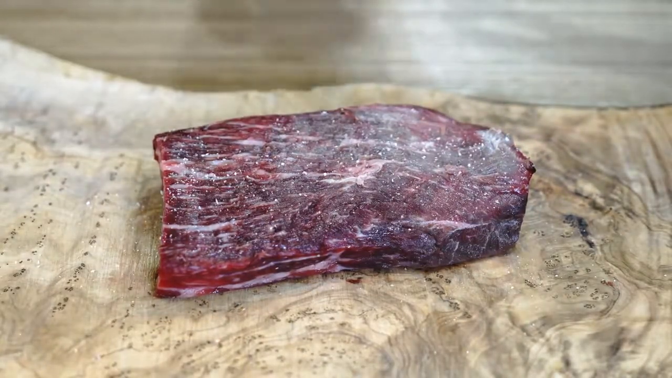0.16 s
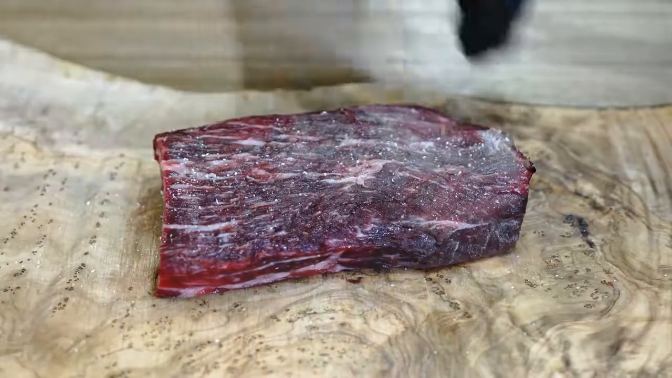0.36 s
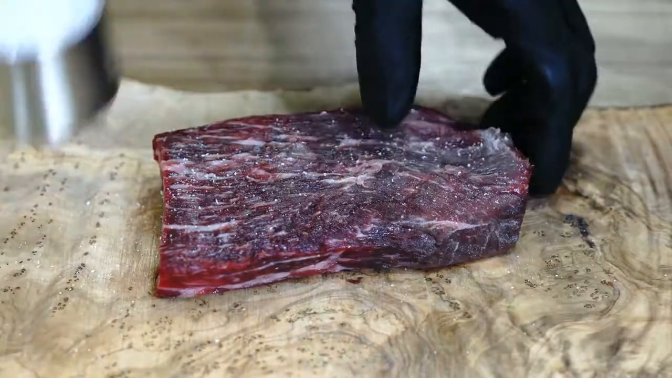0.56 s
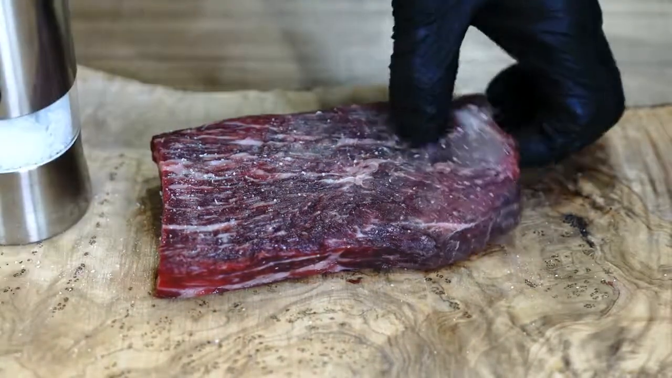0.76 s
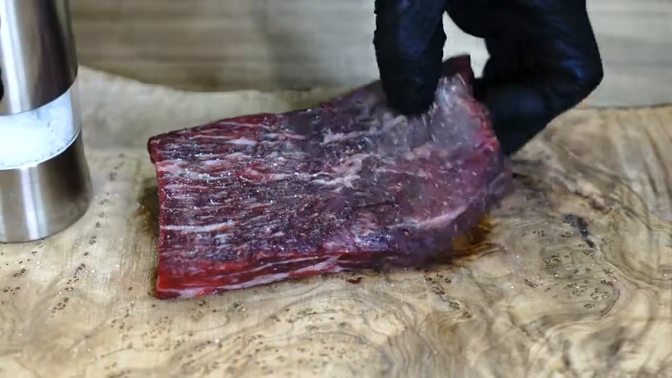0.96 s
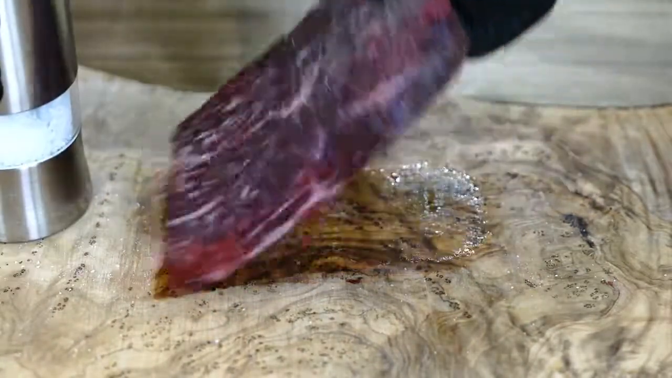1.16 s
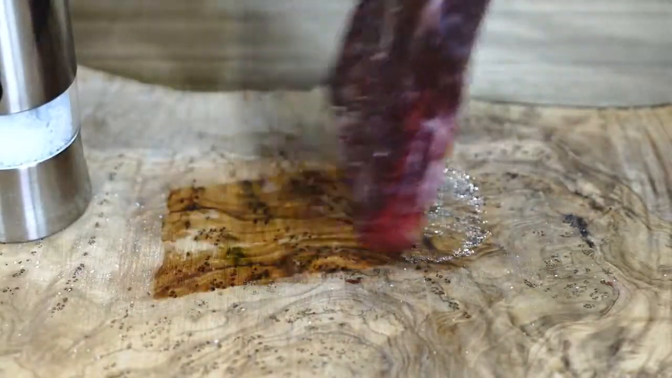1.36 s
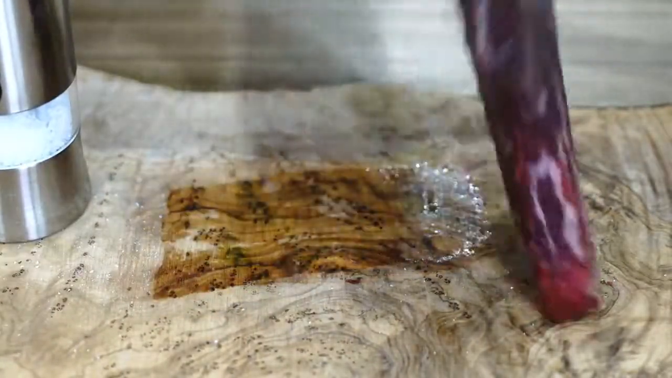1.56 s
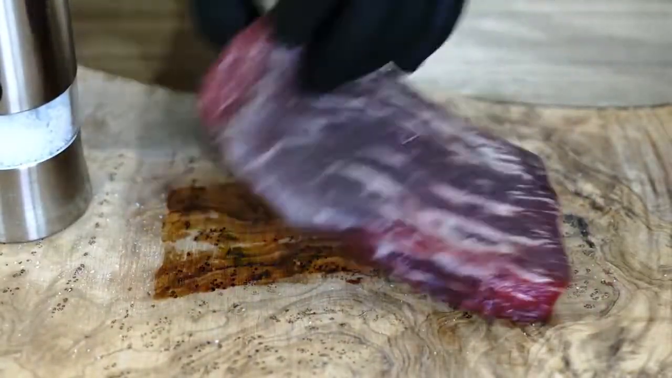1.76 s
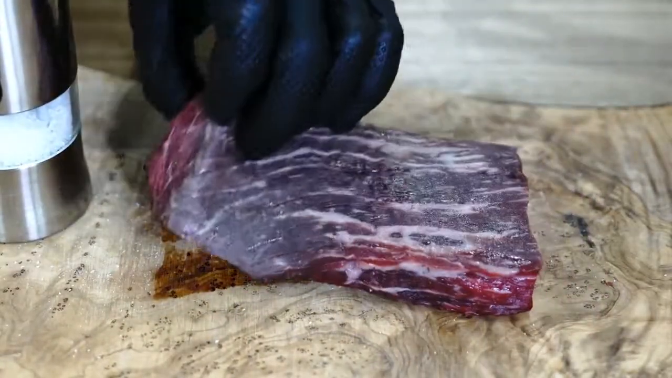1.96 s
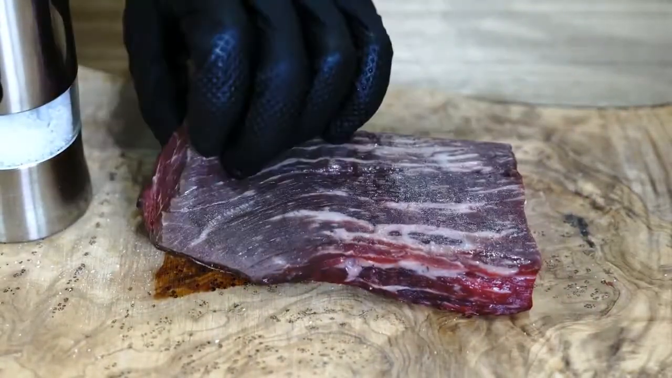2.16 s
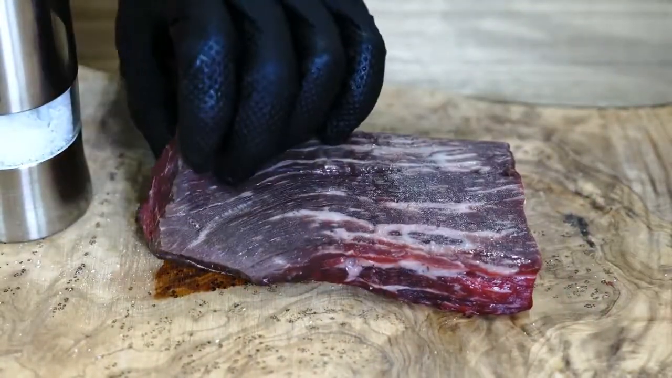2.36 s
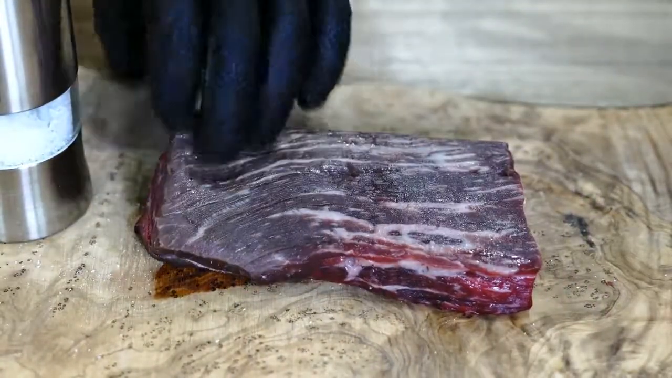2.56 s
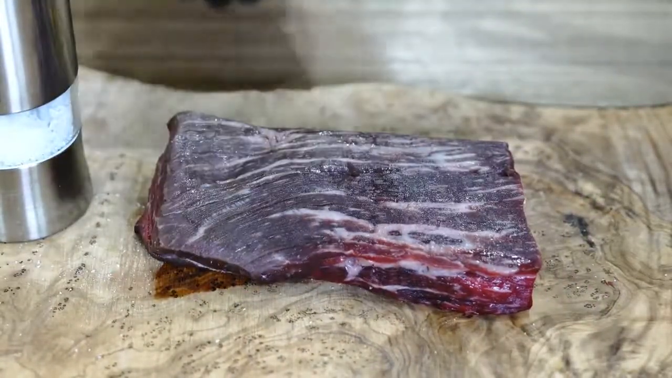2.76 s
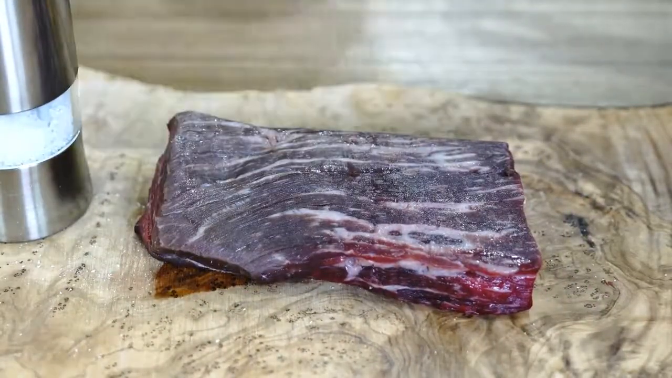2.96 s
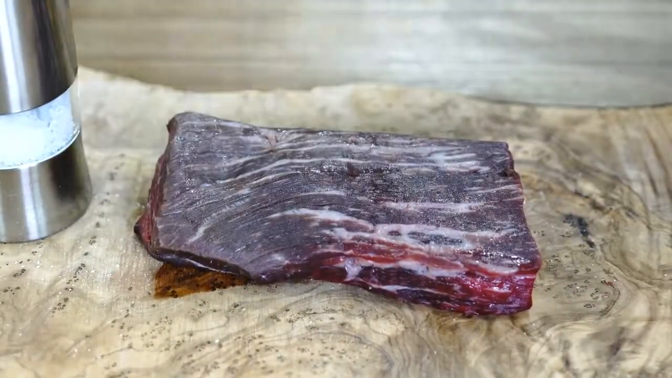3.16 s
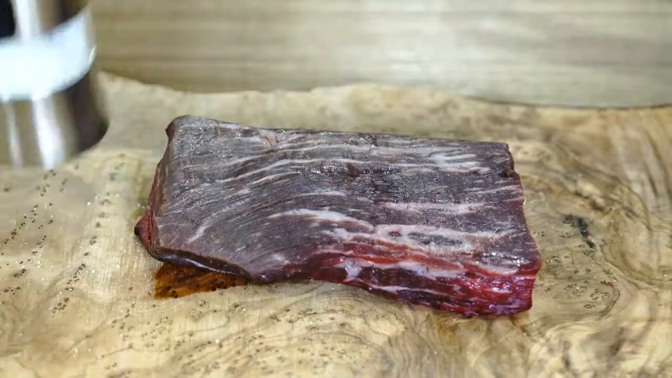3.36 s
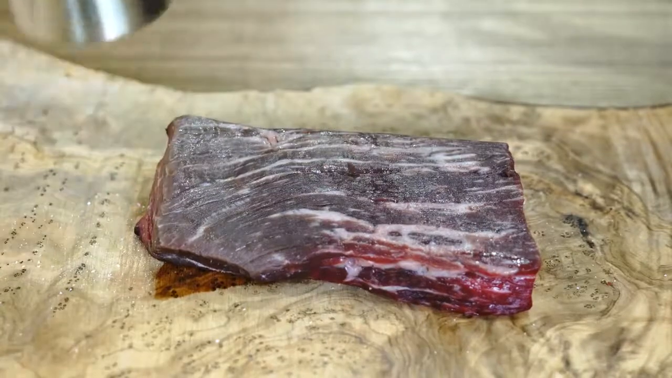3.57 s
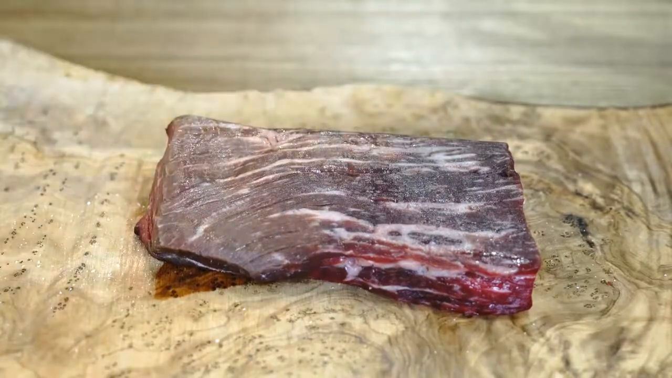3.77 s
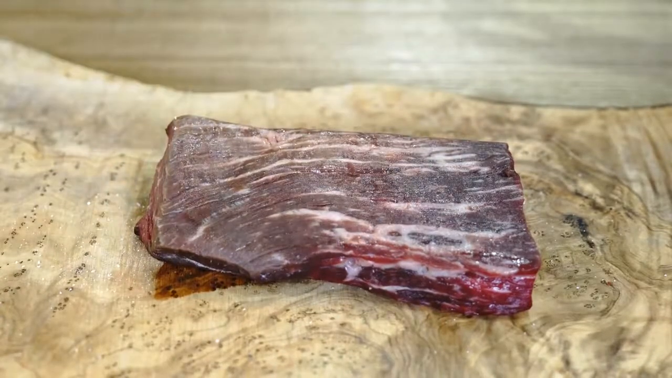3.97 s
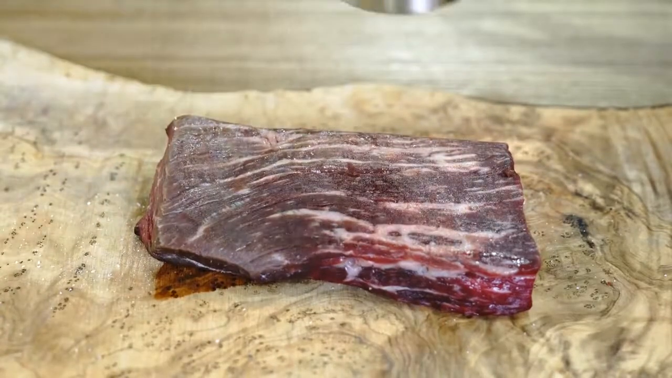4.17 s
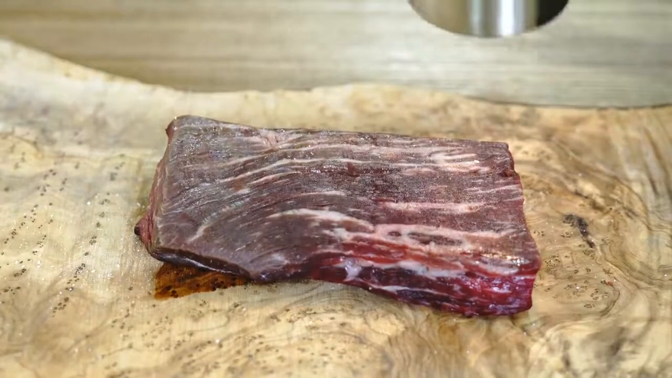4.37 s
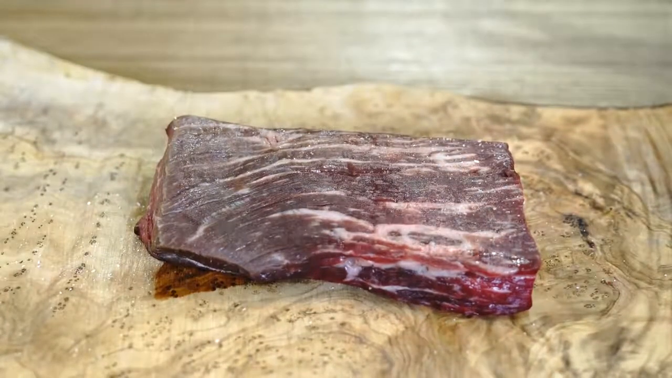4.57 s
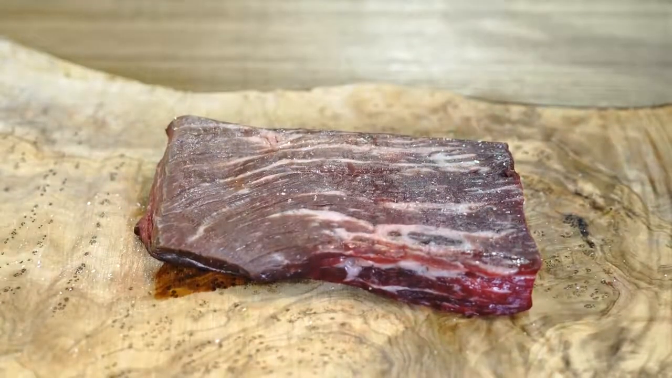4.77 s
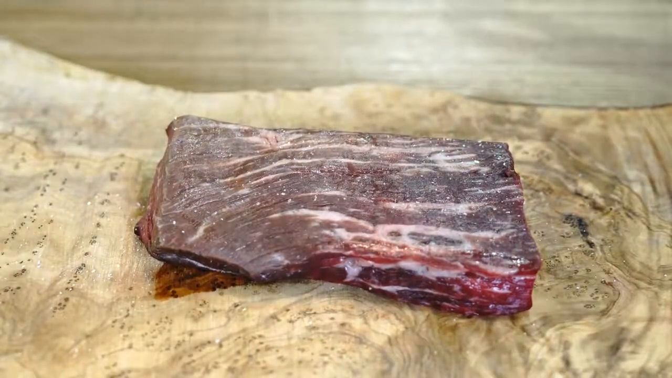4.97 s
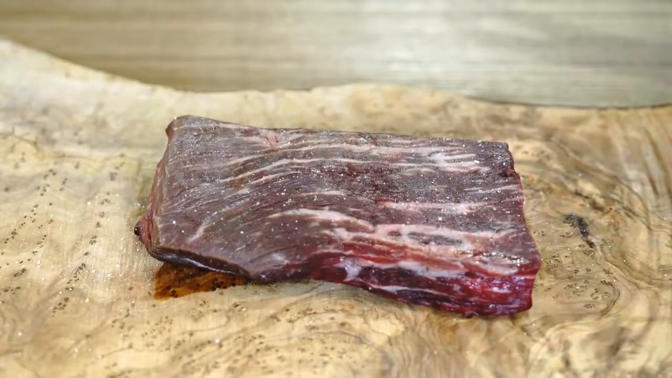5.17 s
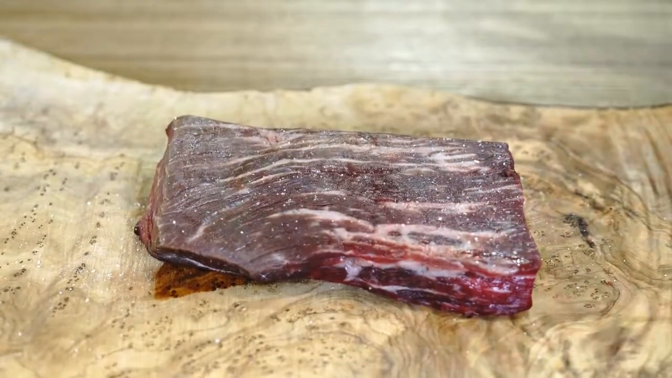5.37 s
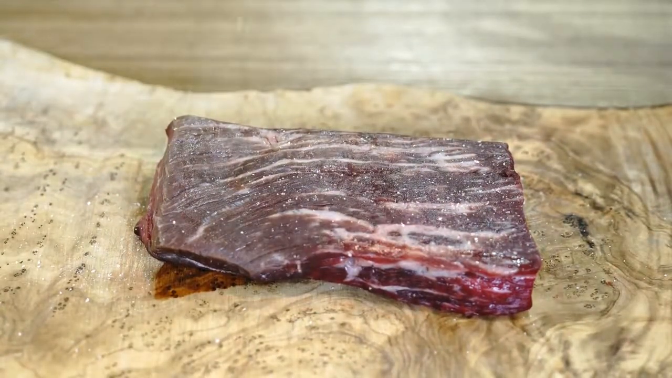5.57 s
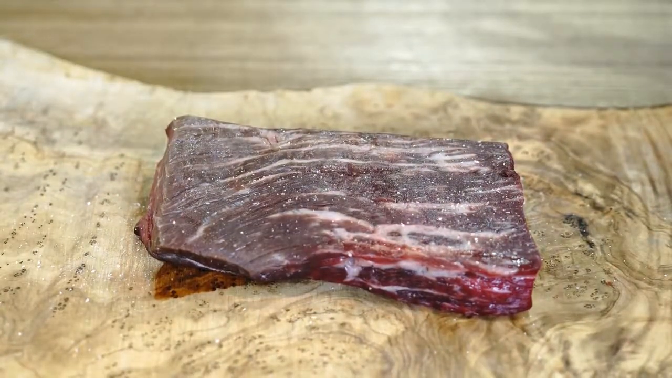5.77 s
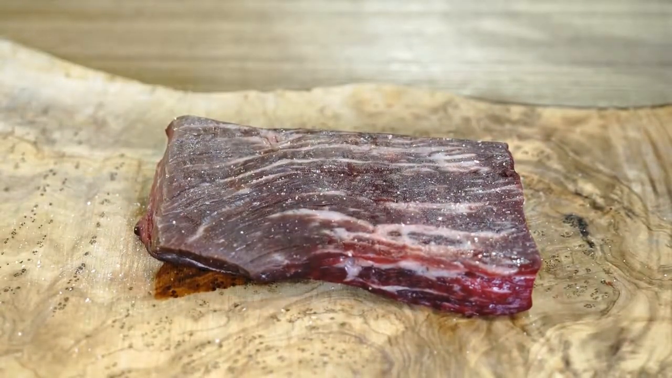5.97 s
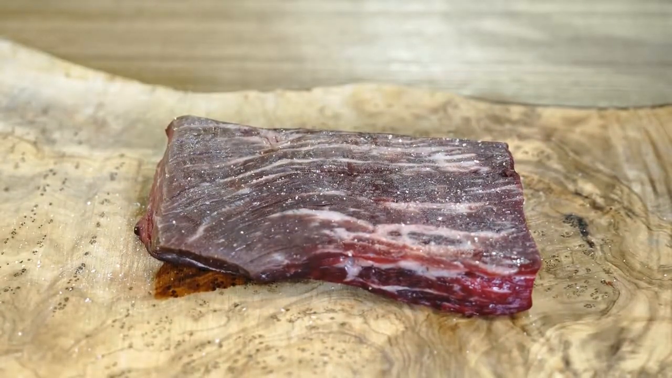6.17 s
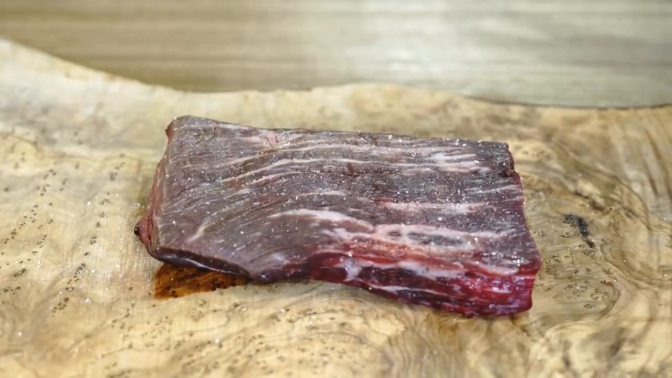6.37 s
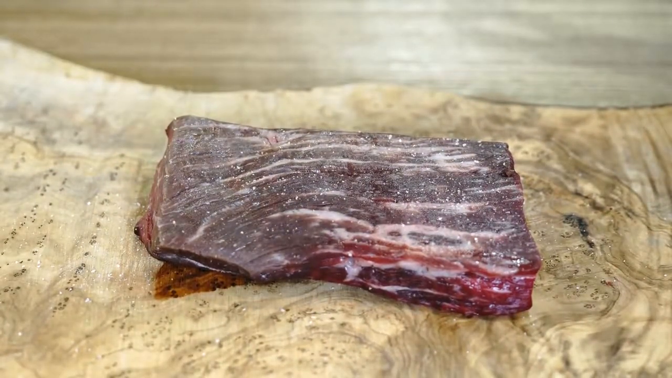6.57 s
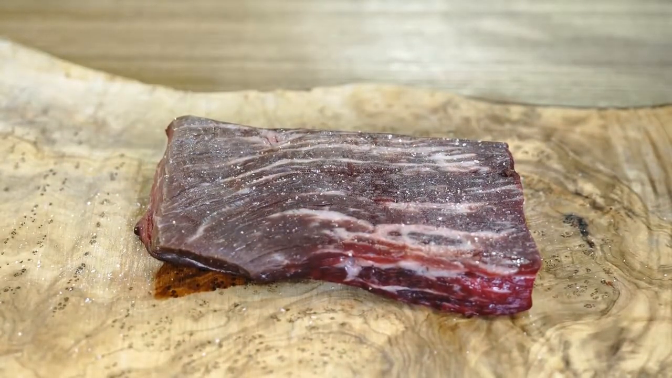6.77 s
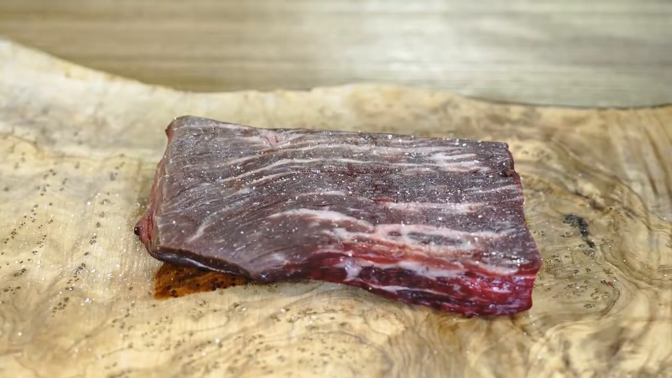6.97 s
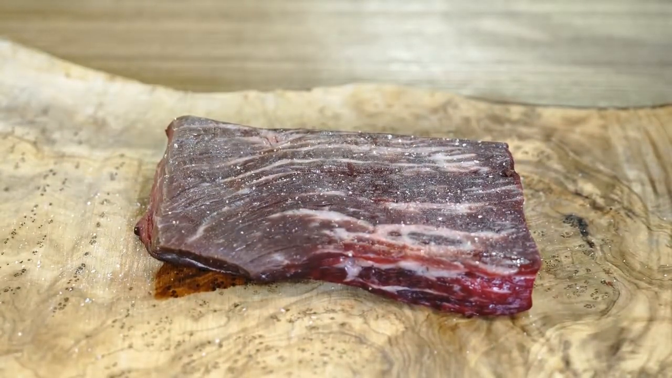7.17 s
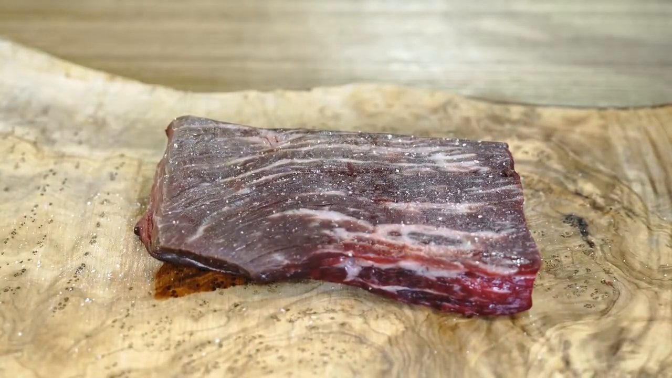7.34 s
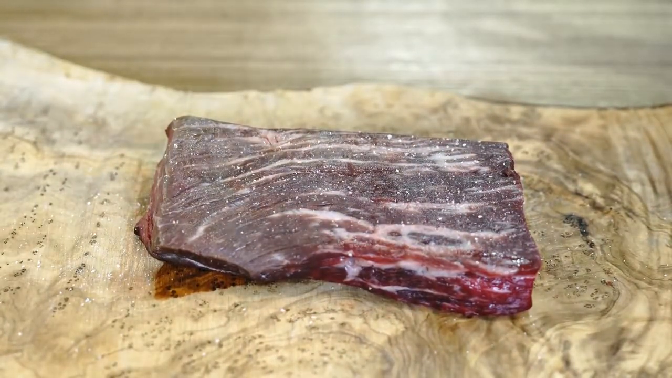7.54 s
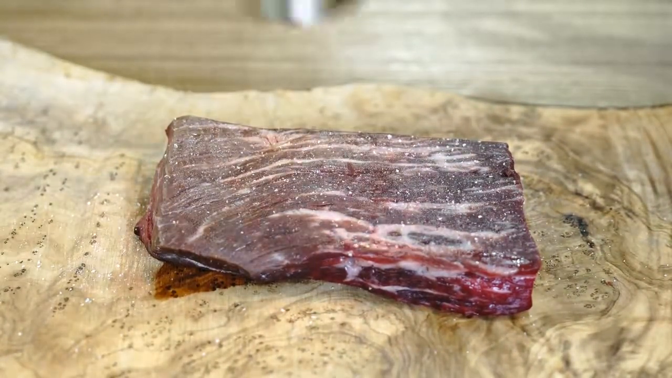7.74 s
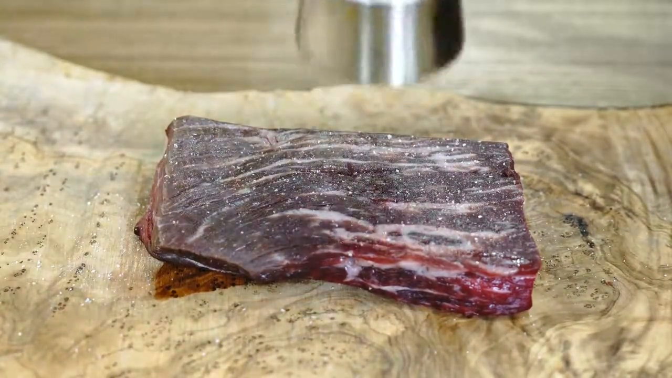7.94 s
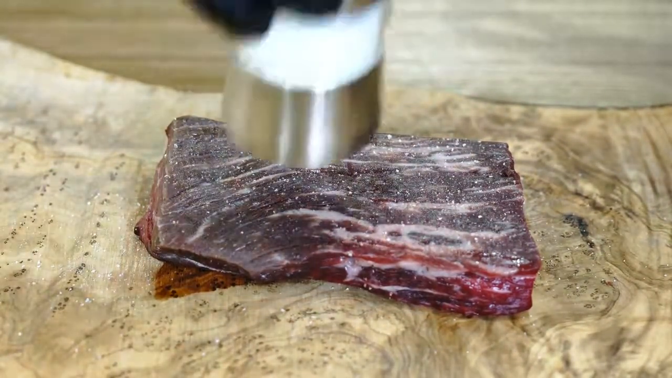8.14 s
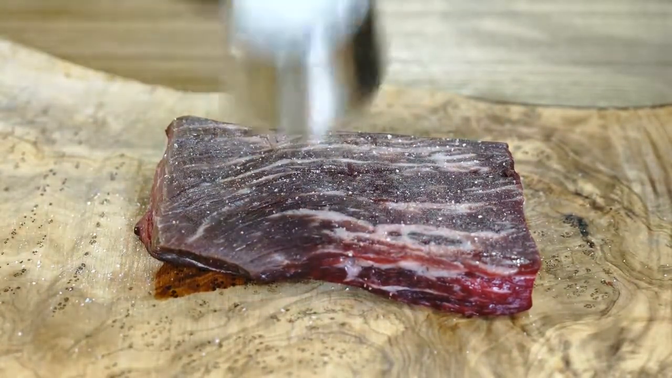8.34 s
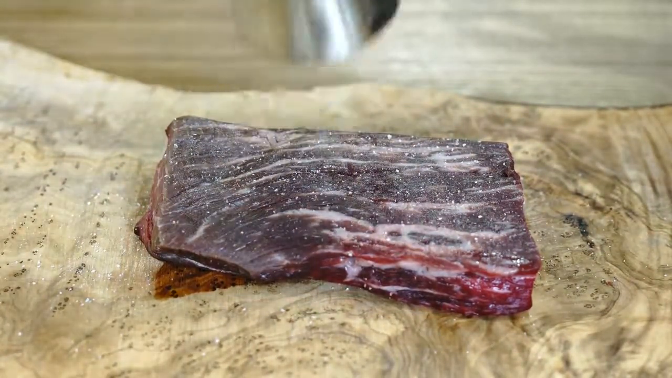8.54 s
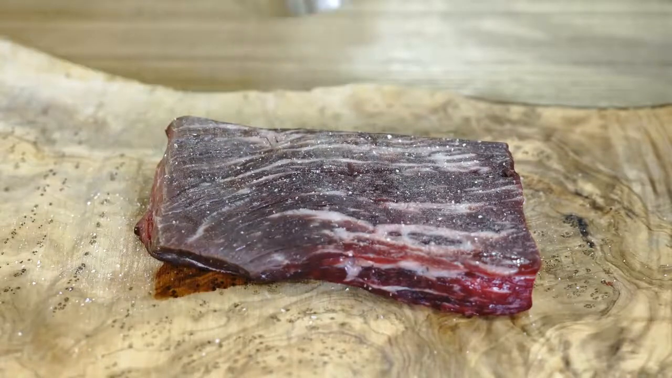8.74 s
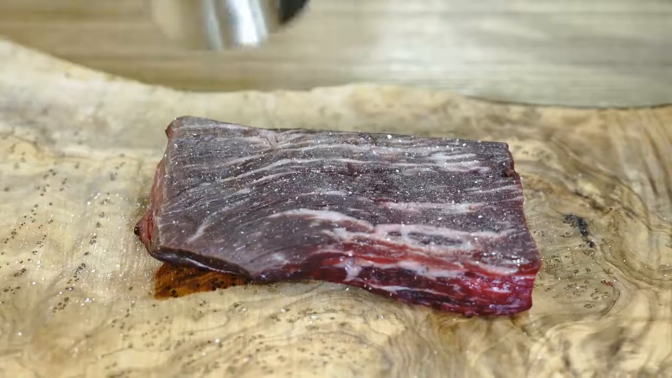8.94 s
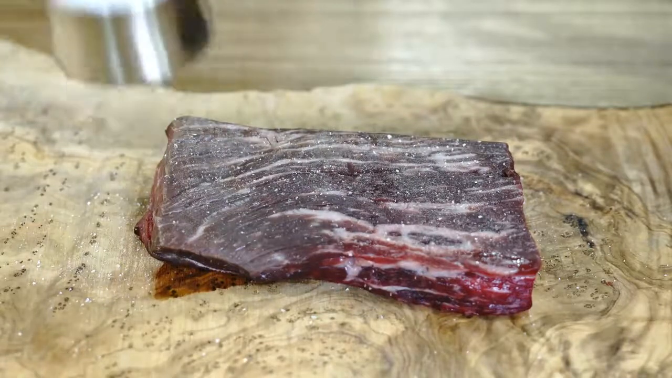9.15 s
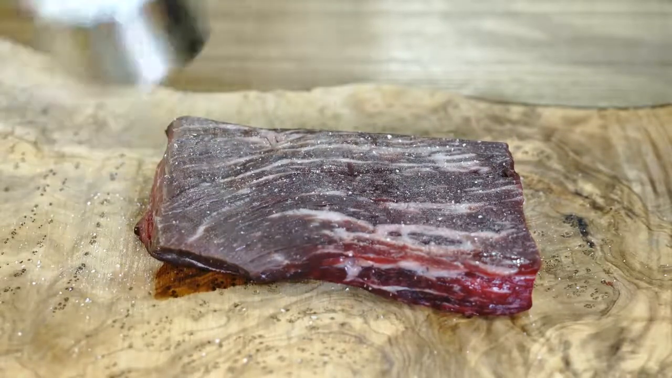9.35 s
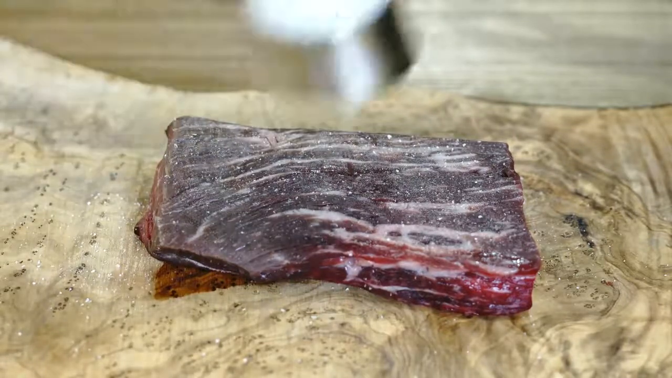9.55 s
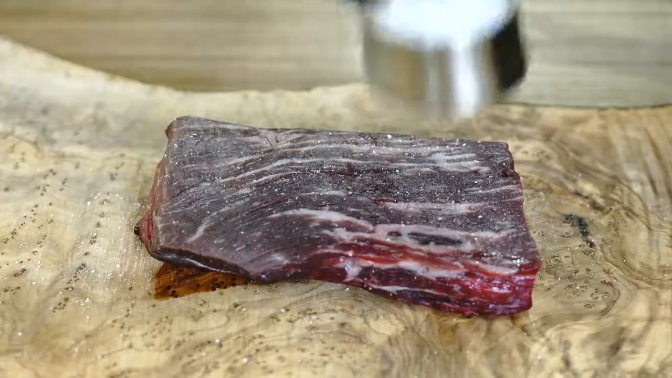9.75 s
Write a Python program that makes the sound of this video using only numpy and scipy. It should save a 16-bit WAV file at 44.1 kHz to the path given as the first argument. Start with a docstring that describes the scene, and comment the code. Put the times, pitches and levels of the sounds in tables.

```python
"""A small kitchen, one close microphone. An electric salt mill grinds over a steak on a wooden board,
stops and is set down with a knock that rings the wood. A gloved hand rubs and turns the wet meat.
The mill runs again, its gear teeth whining, slowing and rattling under load while crystals crack.
Then it is shaken, and the salt hails against lid and burr. Appliances hum faintly behind it all."""
import sys
import numpy as np
from scipy import signal
from scipy.fft import rfft, irfft
from scipy.io import wavfile
from scipy.ndimage import uniform_filter1d

SR = 44100
rng = np.random.default_rng(int(sys.argv[2]) if len(sys.argv) > 2 else 0)


def to_wav(sig):
    """Store sig (one row per channel, or 1-D mono) as 16-bit WAV at the path in sys.argv[1].

    Samples outside -1..1 are clipped; the rate is SR.
    """
    pcm = np.clip(np.atleast_2d(sig), -1, 1) * 32767
    pcm = np.round(pcm).astype(np.int16)
    wavfile.write(sys.argv[1], SR, pcm.T)  # frames by channels


N = 432621
T = np.arange(N) / SR


# motor runs: (button pressed t/s, button snaps back t/s)
MOTOR_RUNS = [(-.1, .379), (3.68, 7.906)]
def mill():
    """One motor drives gears and burr; the more salt is being crushed, the louder they all play."""
    feed_db = salt_feed()
    loaded_hz, speed_hz = motor_speed()
    mesh_hz = speed_hz * (1 + .022 * walk(45) + .028 * walk(400))
    tooth_phase = 2 * np.pi * np.cumsum(mesh_hz) / SR
    # a slow gear runs out of true, so the load throbs once in its turn
    throb_db = 1.6 * np.sin(tooth_phase / 57 + .8 * walk(12)) + 1.3 * walk(90)
    drive = gears(tooth_phase, loaded_hz) * undb(throb_db)
    return (drive + burr(throb_db) + brushes(tooth_phase, mesh_hz)) * undb(feed_db)


def running(coast_s, release_s=.012):
    """Motor gate: 1 while on, dying away once the contact opens, just ahead of the button's snap."""
    return sum((T > on) * np.exp(-np.maximum(T - off + release_s, 0) / coast_s)
               for on, off in MOTOR_RUNS)


# pitch curve of the gear mesh, sagging as the burr bites: (t/s, f/Hz)
MESH_PITCH = [(.16, 1102), (.38, 908.4), (3.75, 1031), (3.98, 1007), (4.08, 880), (4.24, 814), (4.4, 1103),
              (4.6, 1147), (4.95, 1098), (5.48, 1114), (5.6, 1055), (5.85, 948.6), (6.1, 933.6),
              (6.42, 1062), (6.7, 1025), (7.05, 770.6), (7.24, 1069), (7.88, 1151)]
def motor_speed(spin_up_s=.035, spin_down_s=.3):
    """Gear mesh rate in Hz: under load alone, and with spin-up and run-down added."""
    loaded_hz = np.interp(T, *np.transpose(MESH_PITCH))
    spin_up = 1 - .4 * sum((T > on) * np.exp(-np.abs(T - on) / spin_up_s) for on, _ in MOTOR_RUNS)
    return loaded_hz, loaded_hz * spin_up * np.clip(running(spin_down_s), .5, 1)


# fader ride for the amount of salt being crushed: (t/s, level/dB)
FEED_RIDE = [(0.0, -20), (0.188, -22), (0.25, -24.5), (3.88, -23.5), (3.91, -26.5), (4.9, -25),
             (5.24, -28.5), (5.52, -25), (5.72, -24), (6.66, -23), (6.95, -24.5), (7.39, -24), (7.7, -25)]
def salt_feed(start_db=-9.5, start_s=.075, stop_db=-3.5, stop_s=.03):
    """Feed level in dB: salt takes a moment to be drawn in, and is let go as the motor stops."""
    dips_db = sum(start_db * np.exp(-np.abs(T - on) / start_s)
                  + stop_db * np.exp(-np.maximum(off - T, 0) / stop_s) * (T < off + 1)
                  for on, off in MOTOR_RUNS)
    return np.interp(T, *np.transpose(FEED_RIDE)) + dips_db


# EQ of the gear housing: (f/Hz, level/dB)
GEARBOX_EQ = [(150, -34), (330, -22.5), (520, -15), (720, -7.5), (1000, -2), (1230, -3), (1550, 1),
              (1950, 1.5), (2700, -2), (3600, -15.5), (5200, -10.5), (6700, -2), (8600, -15.5),
              (15000, -27)]
def gears(tooth_phase, loaded_hz, strain_hz=1071, knee_hz=21.4, strained_db=2, free_db=-7.5):
    """Teeth rattle and whine in the housing, louder when the load drags them below strain_hz."""
    slack = 1 / (1 + np.exp((strain_hz - loaded_hz) / knee_hz))
    load_db = slack * (free_db - strained_db)
    # every tooth knocks with its own strength, harder once per motor turn
    accent_db = 5.2 * np.cos(tooth_phase) + 2 * np.cos(tooth_phase / 9)
    knocks = grains(rate=7000, spread_db=1.5) * undb(accent_db)
    rattle = undb(-.45 + .085 * load_db) * colour(knocks, GEARBOX_EQ) * running(coast_s=.018)
    # the mesh sings, roughened by play between the teeth; its overtones grow with the load
    play_db = 3.5 * walk(150)
    whine = sum(undb(db + play_db + .55 * k * load_db) * np.sin((k + 1) * tooth_phase + .87 * walk(170))
                for k, db in enumerate([-6, -5.5, -18]))
    return (rattle + whine * running(coast_s=.036)) * undb(strained_db + load_db)


# EQ of the crunch in the burr: (f/Hz, level/dB)
BURR_EQ = [(120, -28), (280, -12.5), (520, 2), (1000, 5.5), (1350, -3), (2300, -3.5), (3600, -7),
           (5300, -2), (7500, 4), (8600, -5), (10800, 1), (12800, 1.5), (14000, -1.5), (16000, -1.5)]
def burr(throb_db):
    """Salt feeds unevenly and is crushed to a dense crunch; small crystals splinter on their own."""
    uneven_db = 1.4 * walk(110) + .35 * throb_db
    crunch = colour(grains(rate=10000, spread_db=2), BURR_EQ) * undb(1 + uneven_db)
    splinters = unit(resonate(grains(rate=45, spread_db=1), 5500, 4500))
    return (crunch + undb(-12) * splinters) * running(coast_s=.023)


def brushes(tooth_phase, mesh_hz):
    """The brushes hiss in two narrow bands that follow the motor, louder when it runs free."""
    low_band = undb(-1.5) * walk(1150) * np.sin(10.3 * tooth_phase)
    high_band = undb(-11) * walk(1100) * np.sin(12.9 * tooth_phase)
    return (low_band + high_band) * (mesh_hz / 1120) ** 5 * running(coast_s=.004)


# cues for large crystals breaking: (t/s, attack level/dB, centre f/Hz)
CRYSTAL_CRACKS = [(.259, -16.5, 2200), (4.069, -13, 2870), (4.272, -9, 5530), (4.327, -8, 2550),
                  (4.415, -14, 5900), (4.792, -7, 5700), (4.8619, -15.5, 2200), (4.989, -7.5, 3220),
                  (5.038, -10.5, 6050), (5.11, -9, 1790), (5.258, -11, 4600), (5.540, -7.5, 1800),
                  (6.083, -8, 6500), (6.12, -13.5, 2800), (6.5126, -13, 2608), (6.790, -8.5, 6400),
                  (7.012, -11.5, 1610), (7.128, -8.5, 7200), (7.4063, -9.5, 2340), (8.841, -10.5, 12500)]
def cracks():
    """Large crystals give way, each with one sharp snap."""
    return snaps(CRYSTAL_CRACKS)


def chips(per_s=6, over_feed_db=6, spread_db=3.5, centre_hz=4850, spread_octaves=.77):
    """Lesser crystals crack at random while the mill runs; their level rides on the feed."""
    out, feed_db = np.zeros(N), salt_feed()
    for on, off in MOTOR_RUNS:
        for k, (jitter, size, pitch) in enumerate(rng.uniform(-1, 1, size=(60, 3))):
            s = on + (k + 1 + jitter) / per_s
            chip = snap(centre_hz * 2 ** (spread_octaves * pitch))
            if 0 < s < off:
                add(out, s, undb(feed_db[int(s * SR)] + over_feed_db + spread_db * size) * chip)
    return out


# the button's two layers, click and housing knock: (level/dB, centre f/Hz)
BUTTON_LAYERS = [(-9.5, 3250), (-15.5, 740)]
def button():
    """The button snaps back at the end of each run."""
    return snaps([(off, db, hz) for _, off in MOTOR_RUNS for db, hz in BUTTON_LAYERS])


# EQ of the salt chamber: (f/Hz, level/dB)
CHAMBER_EQ = [(300, -44.5), (600, -26.5), (800, -30.5), (1030, -12), (1280, -14), (1700, -11.5),
              (2500, -10), (2900, -5), (4150, -3), (6400, 0), (9100, -4.5), (12700, -0.5), (16000, -10)]
# one slide of salt as the mill is tipped: (t/s, level/dB, half length t/s)
TIP_SLIDE = (8.183, -35.5, .018)
# salt landing back on the burr after each shake: (t/s, level/dB, half length t/s)
LANDINGS = [(8.453, -17.5, 0.002), (8.686, -17, 0.012), (8.906, -18.5, 0.026), (9.119, -19.5, 0.025),
            (9.335, -21, 0.022), (9.555, -19, 0.02), (9.758, -20, 0.034)]
def shaking(rise_s=.0083, settle_s=.009, flight_s=.042, lid_db=-2.5, clump_db=2, coarse_db=-27):
    """Each shake throws the salt at the lid and back: a cloud of impacts that trickles to rest."""
    # the lid is hit first, more softly; a looser cloud takes longer to come back
    lid_hits = [(s - flight_s - 1.04 * half_s, db + lid_db, half_s) for s, db, half_s in LANDINGS]
    power = 0
    for s, db, half_s in [TIP_SLIDE] + lid_hits + LANDINGS:
        away_s = np.hypot(T - s, half_s) - half_s
        power += (undb(db) * np.exp(-away_s / np.where(T < s, rise_s, settle_s))) ** 2
    cloud = np.sqrt(power) * undb(clump_db * walk(140))
    impacts = grains(rate=22000, spread_db=1.8)
    burr_ring = undb(-16.5) * unit(resonate(impacts, 1110, 194))
    burr_ring += undb(-10.5) * unit(resonate(impacts, 6900, 3600))
    # a few coarse crystals stray from the cloud and tick on their own
    coarse = undb(coarse_db) * unit(resonate(grains(rate=39, spread_db=-1), 10300, 9000))
    return (colour(impacts, CHAMBER_EQ) + .32 * burr_ring) * cloud + coarse * np.sqrt(cloud)


# modes of the board with the mill on it: (f/Hz, level/dB, 60 dB decay t/s)
BOARD_MODES = [(124, -15, 0.13), (250, -1.5, 0.076), (289, -2, 0.068), (395, -4, 0.038), (528, -5, 0.056),
               (875, -10, 0.045), (1130, 2.5, 0.033), (1286, -7, 0.08), (1360, -2, 0.053),
               (1520, -2, 0.028), (1765, 0.5, 0.029), (1940, -8.5, 0.067), (2790, -10, 0.04),
               (3260, -4.5, 0.031)]
# mill and meat hitting the board: (t/s, level/dB as if packed into 10 ms, low-pass f/Hz)
BOARD_HITS = [(0.695, -42.5, 300), (.826, -9.5, 3170), (1.718, -34, 3000), (2.5, -42, 450)]
def board(attack_s=.00134, contact_s=.0046, rattle_s=.025):
    """Each blow rings the board; a soft contact leaves mainly the low modes."""
    out, t = np.zeros(N), np.arange(SR // 3) / SR
    ring = sum((-1) ** k * undb(db - 60 * t / t60) * np.sin(2 * np.pi * hz * t)
               for k, (hz, db, t60) in enumerate(BOARD_MODES))
    for s, db, bright_hz in BOARD_HITS:
        scrape = unit(resonate(rng.standard_normal(len(t)), 2000, 16000)) * np.exp(-t / contact_s)
        rattle = unit(resonate(rng.standard_normal(len(t)), 520, 1700)) * np.exp(-t / rattle_s)
        blow = (ring + undb(1.5) * scrape + undb(-7.5) * rattle) * np.minimum(t / attack_s, 1)
        softened = signal.lfilter(*signal.butter(1, bright_hz, fs=SR), blow)
        add(out, s, undb(db) * packed(softened, .01))
    return out


# glove strokes on steel and meat: (t/s, length t/s, level/dB, centre f/Hz, width f/Hz)
GLOVE_RUBS = [(0.443, 0.37, -51.5, 2400, 8950), (.607, 0.046, -36.5, 3120, 3300),
              (0.736, 0.019, -27, 4100, 7500), (0.756, 0.442, -45.5, 6900, 27200),
              (0.918, 0.026, -31.5, 5500, 8000), (1.798, 0.19, -58.5, 4000, 12000),
              (2.473, .12, -51.5, 2610, 1400), (2.46, .2, -51.5, 4400, 12900),
              (2.674, .52, -53, 1630, 5000), (3.216, 0.024, -50, 5500, 18000)]
def glove(rise_s=.0054, fade_s=.01):
    """Rubber slides in dense tiny slips."""
    out = np.zeros(N)
    slips = grains(rate=9000, spread_db=1.8) * undb(1.3 * walk(110))
    for s, length_s, db, hz, width_hz in GLOVE_RUBS:
        t = np.arange(int((length_s + 10 * fade_s) * SR)) / SR
        stroke = slips[int(s * SR):][:len(t)]
        rub = unit(resonate(resonate(stroke, hz, width_hz), hz, width_hz))
        envelope = np.minimum(t / rise_s, 1) * np.exp(-np.maximum(t - length_s, 0) / fade_s)
        add(out, s, undb(db) * rub * envelope)
    return out


# cues for small wet ticks: (t/s, attack level/dB, centre f/Hz)
MEAT_TICKS = [(1.0234, -35, 3850), (1.1264, -36, 1530), (1.2717, -44, 3000), (2.6455, -36, 11200),
              (2.9216, -38.5, 1890)]
def meat():
    """Wet meat ticks as it peels and settles."""
    return snaps(MEAT_TICKS)


def room(x, t60_s=.28, wet_db=-9, count=8):
    """Adds a short wash of reflections whose pattern shifts as the hand and mill move."""
    t = np.arange(SR // 2) / SR
    decay = undb(-60 * t / t60_s) * (t > .004)
    wash = np.zeros(N)
    for _ in range(count):
        tail = resonate(rng.standard_normal(len(t)) * decay, 2300, 27000)
        sway = np.sqrt(2 / count) * np.sin(2 * np.pi * (rng.uniform(1, 4) * T + rng.random()))
        wash += signal.oaconvolve(x * sway, tail / np.linalg.norm(tail))[:N]
    return x + undb(wet_db) * wash


# EQ of the room tone: (f/Hz, level/dB)
ROOM_TONE_EQ = [(15, -59), (25, -23), (74, -8.5), (96, -6), (225, -6), (429, -8.5), (475, -9), (555, -8),
                (700, -11.5), (12000, -29.5), (15600, -72), (22000, -120)]
# hum and whistle of appliances: (f/Hz, level/dB)
APPLIANCE_TONES = [(108, -72.5), (220, -68.5), (613, -71), (13550, -75)]
def kitchen(tone_db=-55.5, hiss_db=-69):
    """The bed: quiet room tone, a fine hiss and the hum of appliances."""
    hum = sum(undb(db) * np.sqrt(2) * np.sin(2 * np.pi * hz * T + .61 * walk(8))
              for hz, db in APPLIANCE_TONES)
    room_tone = undb(tone_db) * colour(rng.standard_normal(N), ROOM_TONE_EQ)
    return room_tone + undb(hiss_db) * rng.standard_normal(N) + hum


def snap(hz, ring_s=.002, crumble_s=.03, crumble_db=-23, edge_db=-35):
    """Something gives way in a millisecond or two and its crumbs follow."""
    t = np.arange(SR // 20) / SR
    envelope = np.exp(-(t / ring_s) ** 2) + undb(crumble_db) * np.exp(-t / crumble_s)
    burst = rng.choice([-1, 1], len(t)) * envelope
    body = resonate(resonate(burst, hz, 2 * hz), hz, 2 * hz)
    edge = undb(edge_db) * resonate(burst, 10000, 14000)
    return packed(body + edge, .0025)


def snaps(cues):
    """A track with a fresh snap on every cue."""
    out = np.zeros(N)
    for s, db, hz in cues:
        add(out, s, undb(db) * snap(hz))
    return out


def grains(rate, spread_db):
    """Tiny impacts of uneven size at random moments, about rate per second."""
    size = undb(spread_db * np.minimum(rng.exponential(size=N), 2 * np.pi))
    return unit((rng.random(N) < rate / SR) * size * rng.standard_normal(N))


def walk(rate):
    """Smooth random modulation with rms 1, turning rate times a second."""
    step = int(SR / rate)
    held = np.repeat(rng.standard_normal(N // step + 1), step)
    return unit(uniform_filter1d(held, step)[:N])


def resonate(x, hz, width_hz):
    """Two-pole resonance, gain 1 at its centre."""
    g, k = np.tan(np.pi * min(hz / SR, .45)), width_hz / hz
    return signal.lfilter([g * k, 0, -g * k], [1 + g * k + g * g, 2 * g * g - 2, 1 - g * k + g * g], x)


def colour(x, points, size=2048):
    """Minimum-phase EQ through (f/Hz, level/dB) points; the result has rms 1."""
    hz, db = np.transpose(points)
    bin_hz = np.arange(size // 2 + 1) * SR / size
    gain = undb(np.interp(np.log(bin_hz + 1), np.log(hz), db))
    cepstrum = irfft(np.log(gain))
    cepstrum[1:size // 2] *= 2
    cepstrum[size // 2 + 1:] = 0
    impulse = irfft(np.exp(rfft(cepstrum)))
    return unit(signal.fftconvolve(x, impulse)[:len(x)])


def undb(db):
    """Decibels to gain."""
    return 10 ** (np.asarray(db) / 20)


def unit(x):
    """Scale to rms 1."""
    return x / np.sqrt(np.mean(x ** 2))


def packed(x, length_s):
    """Scale a short sound to the energy that rms 1 has over length_s."""
    return x / np.sqrt(np.sum(x ** 2) / (length_s * SR))


def add(out, s, x):
    """Mix a short sound in at time s."""
    i = int(s * SR)
    out[i:i + len(x)] += x[:N - i]


def scene(direct_share=.2):
    """All sources share one spot in front of the microphone; the snaps play a little drier."""
    clicks = cracks() + meat() + button() + chips()
    room_send = mill() + (1 - direct_share) * clicks + shaking() + glove() + board()
    mono = room(room_send) + direct_share * clicks + kitchen()
    return np.array([mono, mono])


def record(dry, top_hz=15800):
    """The sharpest cracks overload the input; the top is cut."""
    high_cut = signal.ellip(10, .1, 70, top_hz, fs=SR, output="sos")
    return signal.sosfilt(high_cut, np.clip(dry, -1, 1))


dry = scene()
out = record(dry)
to_wav(out)
```